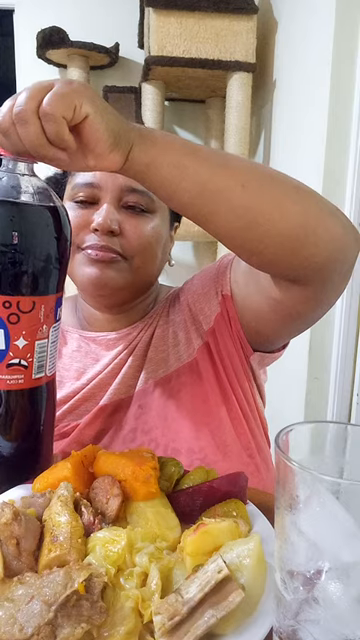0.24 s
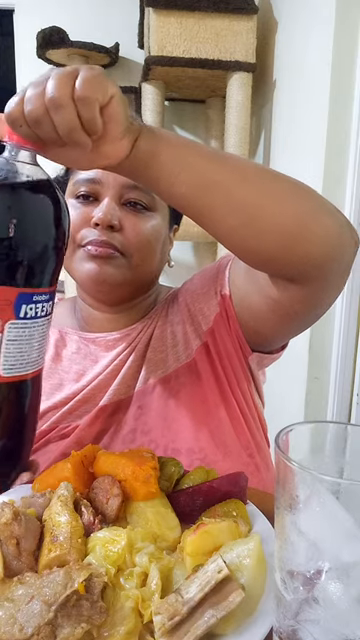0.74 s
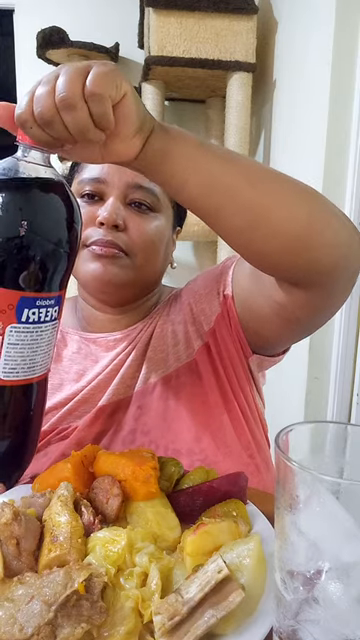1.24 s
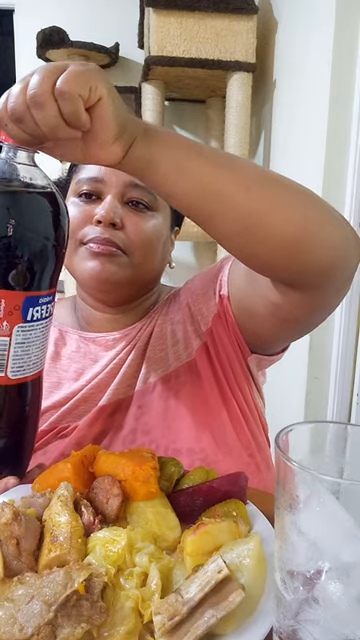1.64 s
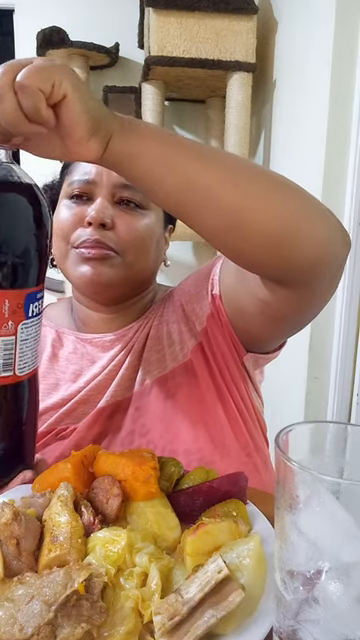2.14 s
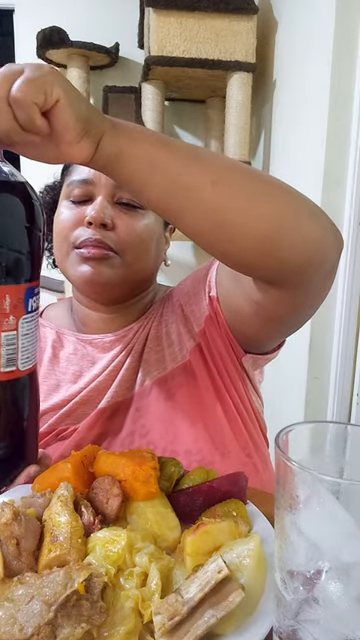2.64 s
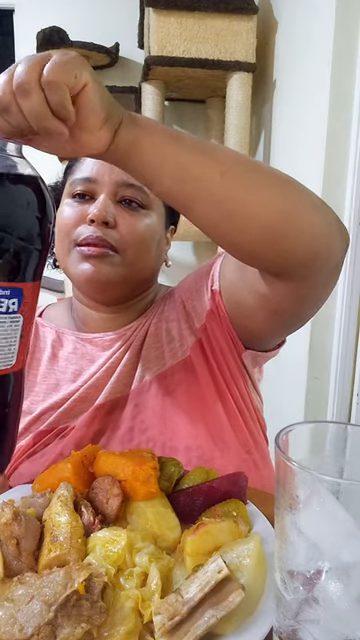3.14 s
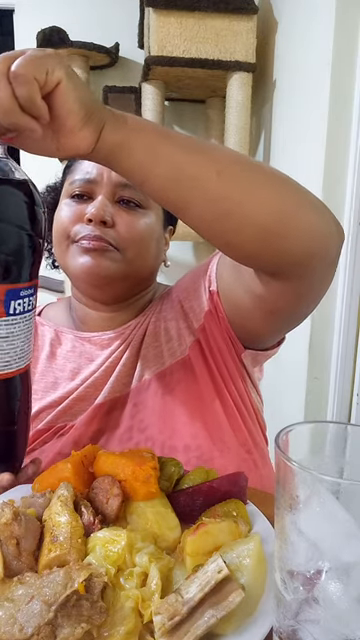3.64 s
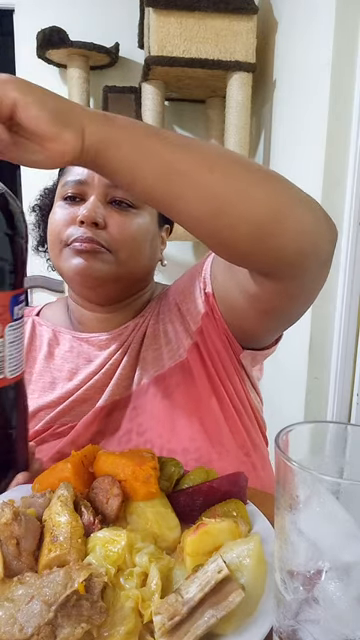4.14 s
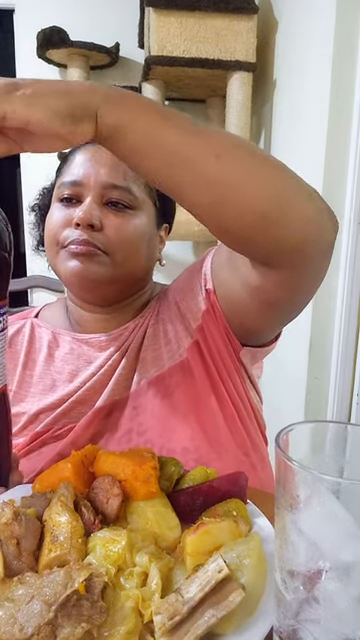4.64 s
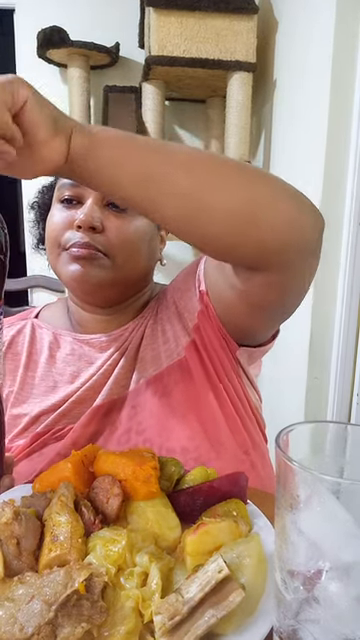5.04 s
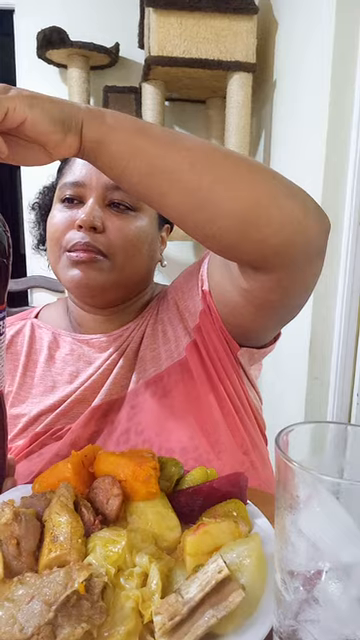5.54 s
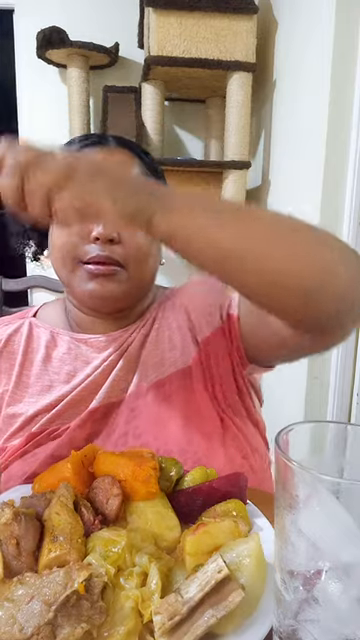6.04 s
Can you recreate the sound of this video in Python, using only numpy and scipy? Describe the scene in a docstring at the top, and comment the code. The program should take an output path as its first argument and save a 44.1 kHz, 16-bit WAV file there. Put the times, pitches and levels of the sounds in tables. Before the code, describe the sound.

A plastic soda bottle is eased open close to the microphone in a small, quietly rumbling room. Gas hisses out in two long spurts and a third short one. The cap's ring then snaps and clicks in a quick cluster as fingers rub the plastic. Faint thin squeaks and light ticks follow as the cap turns, while a vehicle's low drone grows outside.

```python
"""A plastic bottle cap is eased open near a two-port microphone, in a small, hard, quietly rumbling room.
First, gas escapes through the thread in three spurts: turbulent jet noise shaped by the neck's resonances.
From about 3 s a vehicle drones up outside, its harmonics rising with the engine's firing rate.
Near 4 s the cap's ring snaps and clicks, each impulse exciting damped modes, and fingers rub the plastic.
Last, friction in the thread gives faint squeaks as the cap comes off."""
import sys
import numpy as np
from scipy import signal
from scipy.fft import rfft, irfft
from scipy.io import wavfile
from scipy.ndimage import uniform_filter1d

SR = 44100
rng = np.random.default_rng(int(sys.argv[2]) if len(sys.argv) > 2 else 0)


def output_pcm(signal):
    """Save a mono or channel-first signal as 16-bit PCM at the path in sys.argv[1].

    Samples are clipped to [-1, 1] before scaling.
    """
    pcm = np.clip(np.atleast_2d(signal).T, -1, 1) * 32767
    wavfile.write(sys.argv[1], SR, np.round(pcm).astype(np.int16))


N = 276810
T = np.arange(N) / SR

# Likeness of diffuse sound at the two ports: frequency_hz, correlation
COHERENCE = [(60, 0.93), (150, 0.98), (380, 0.49), (950, 0.041), (2380, -0.023), (5980, 0.00097),
             (15000, -0.089)]
# Spectrum of the room's rumble and hiss: frequency_hz, density_db
AIR_SPECTRUM = [(15, -81), (25, -60.5), (80, -1), (129, -3.5), (165, -2), (241, -10.5), (424, -12.5),
                (460, -17.5), (498, -16.5), (670, -23), (2190, -31), (2950, -28), (3470, -30),
                (8220, -34.5), (15700, -29.5)]
# Broad resonances in that hiss: centre_hz, width_hz, gain_db
AIR_RESONANCES = [(2700, 420, 5), (8100, 340, 11)]
# Irregular swells of a low rumble near 75 Hz: time_s, level_db
LOW_SWELLS = [(0.0, -49.5), (1.08, -63), (1.31, -48), (1.4, -56.5), (1.89, -46), (1.99, -54), (3.58, -61),
              (3.61, -47), (4.47, -54), (4.91, -41), (5.03, -51), (5.5, -43), (5.59, -60), (5.73, -46.5),
              (6.2, -45), (6.27, -62)]
# The engine speeding up: time_s, firing_rate_hz
FIRING_RATE = [(2.8, 54.03), (3.84, 54.62), (4.2, 56.68), (4.62, 57.56), (4.8, 58.78), (5.25, 58.76),
               (5.49, 60.13), (5.8, 60.66), (6.28, 61.05)]
# Engine harmonics that swell and sink: time_s, second_db, third_db, fifth_db
THROBBING_ORDERS = [(2.8, -76, -71, -75), (3.6, -59, -55, -75), (3.84, -53, -57, -63.5),
                    (4.21, -51, -51, -66), (4.33, -69, -50.5, -70), (4.62, -44, -49.5, -58.5),
                    (4.8, -37, -68, -59), (5.02, -45.5, -63, -51.5), (5.22, -43.5, -54, -46.5),
                    (5.33, -48, -52, -61), (5.42, -34, -55, -49), (5.56, -33.5, -54, -55),
                    (5.75, -47.5, -51, -52), (5.8, -39.5, -45, -51), (6.11, -38.5, -48.5, -50),
                    (6.28, -38, -44, -52.5)]
# Level of a low rumble, under the gas spurts at first, then the approaching vehicle: time_s, level_db
RUMBLE_LEVEL = [(0.0, -49), (0.56, -54.5), (1.17, -55.5), (1.62, -49.5), (2.48, -54), (2.64, -66),
                (3.55, -57), (3.98, -51), (4.65, -46), (5.63, -44.5), (6.28, -41.5)]
# Spectrum of that rumble: frequency_hz, density_db
RUMBLE_SPECTRUM = [(18, -56), (30, -34), (123, -3.5), (208, -16), (301, -10.5), (401, -15.5), (660, -20.5),
                   (952, -25.5), (2040, -31), (2640, -26.5), (3260, -32), (5800, -41.5), (15700, -49)]
# Engine harmonics that follow its level: harmonic_number, level_re_rumble_db
RUMBLE_ORDERS = [(1, -38), (4, -10.5), (6, -17), (7, -17.5), (8, -18), (9, -17), (10, -33), (11, -24)]
# Reverberation time of the room: frequency_hz, t60_s
REVERB_TIME = [(500, 0.22), (1500, 0.3), (3500, 0.29), (9000, 0.26), (15000, 0.2)]
# Colour of the reverberation, as walls and cloth absorb treble: frequency_hz, gain_db
REVERB_SPECTRUM = [(500, 0), (3000, -1), (6000, -4), (10000, -3), (15000, -5.5)]
# Finger strokes on the plastic: start_s, length_s, level_db
RUB_STROKES = [(3.975, .04, -44.5), (4.597, 0.11, -38), (4.715, 0.033, -39.5), (4.77, .02, -40),
               (4.806, 0.041, -42), (5.22, 0.14, -47.5), (5.706, 0.08, -52), (5.862, 0.11, -49.5),
               (5.942, 0.12, -43), (6.087, 0.017, -47)]
# Spectrum of the rubbing: frequency_hz, density_db
RUB_SPECTRUM = [(300, -45), (700, -11), (1400, -6), (2000, -2.5), (2800, -3.5), (4300, -6), (6000, -18),
                (12000, -18.5)]
# Squeaks of the thread: start_s, length_s, first_pitch_hz, last_pitch_hz, level_db
SQUEAK_GLIDES = [(5.375, .035, 8600, 9400, -57), (5.41, .085, 10300, 9300, -66),
                 (5.5, .04, 9150, 9000, -62), (5.54, .04, 9150, 9650, -69), (5.58, .03, 9650, 8600, -69),
                 (5.625, .035, 11000, 9500, -68), (5.745, .062, 7950, 9000, -49),
                 (5.8, .028, 8800, 7900, -54), (5.87, .085, 13600, 14750, -62)]
# Snaps and ticks: start_s, level_db (over 4 ms), place (0 body, 1 wall, 2 cap, 3 rim), left_right_db
SNAPS = [(2.1894, -23, 1.86, -3), (2.7552, -44, 3.04, -2), (3.77, -39, 3.6, -2), (3.8057, -46, 2.5, -1),
         (3.899, -25.5, 2.8, 1), (4.0193, -17, 1.87, 0.5), (4.0435, -23.5, 2.4, 1), (4.0657, -24.5, 2.8, 0),
         (4.0824, -39, 4.2, -9), (4.1165, -39, 3.7, 3), (4.1482, -30.5, 2.6, -2), (4.227, -44.5, 2.6, -2),
         (4.3026, -43.5, 3.6, -3), (4.4245, -25, 1.9, -1.5), (4.4768, -25, 2.66, -1),
         (4.4986, -22.5, 2.5, 2), (4.5071, -25.5, 2.35, -4), (4.5283, -12, 1.77, -1.5),
         (4.5805, -20, 2.1, -3), (4.6717, -39.5, 2.2, -4), (4.6944, -42, 1.9, 1.5), (4.815, -27.5, 0.68, 2),
         (5.0286, -40.5, 3.3, 0), (5.0455, -40.5, 3.1, -1), (5.1793, -44, 1.05, 3), (5.2097, -37, 1, 2),
         (5.2345, -55, 2.84, 3), (5.267, -52, 3.2, -1), (5.2811, -40, 1, 0), (5.4473, -48, 3.2, -1),
         (5.4984, -46.5, 2.9, -2), (5.6144, -54, 3, 3), (5.7487, -53, 4, -1), (5.799, -46, 3.3, 1),
         (5.8303, -48, 3.2, 1), (5.9506, -34, 3.4, -2), (5.9704, -43, 4.2, 1), (6.095, -41.5, 2.2, 0),
         (6.1649, -49, 3.6, -8)]
# Modes of the bottle's body and wall, the cap and its rim: frequency_hz, level_db, t60_s
BODY_MODES = [(446, 3.5, 0.0098), (770, -12, 0.011), (960, 6, 0.0073), (1374, 4, 0.02)]
WALL_MODES = [(1750, -3, .004), (2050, 0, .007), (2450, -1, .004), (2850, 0, .004)]
CAP_MODES = [(3540, 8, 0.0027), (4410, 15, 0.0027), (5050, -24, 0.012), (6060, -12, 0.011)]
RIM_MODES = [(8440, 14.5, 0.0014), (9960, -16.5, 0.00067), (11900, 4.5, 0.0016), (14100, 0, 0.0026),
             (14200, -18, .002)]
# Course of the gas flow, one table a spurt: time_s, flow_db, neck_resonance_db, treble_lift_db
SPURT_FLOWS = [
    [(0.0, -30, -5.5, 3.5), (0.068, -21, -4, 2), (0.15, -17, -3, 0.5), (0.25, -18.5, -4.5, 0),
     (0.366, -20.5, -5, 1), (0.42, -27, -4, 5), (0.92, -32, -6, 3.5), (1.098, -34.5, -5, 3),
     (1.24, -51, -19, 4)],
    [(1.24, -53, -11, -4.5), (1.38, -34.5, -7, 6.5), (1.56, -28, -11.5, 1), (1.62, -21.5, -12.5, -1.5),
     (1.72, -23, -13.5, -0.5), (1.964, -32.5, -11.5, -6.5), (2.1, -23, -12, -2), (2.178, -26, -14.5, -4),
     (2.212, -22.5, -6.5, 1), (2.348, -20.5, -2, 4.5), (2.496, -28, -6.5, 1.5), (2.616, -43.5, -5, 0),
     (2.72, -93, -9, -1)],
    [(3.12, -66, -3, -1), (3.17, -49, -5.5, -5), (3.294, -17.5, -13, 1), (3.34, -22, -14, -1),
     (3.396, -45.5, -14, -8), (3.55, -64, -19, -6)],
]
# Spectrum of the jet: frequency_hz, density_db
JET_SPECTRUM = [(290, -66), (500, -31), (1070, -28), (1470, -13.5), (1660, -12), (2030, 5.5), (2240, 0),
                (2700, 5), (2900, -12), (4350, -5), (6700, -7), (8950, -0.5), (10500, -7), (11400, -7.5),
                (15700, -6)]
# Gains of the jet's upper bands, one row a spurt: neck_overtone_db, gap_whistle_db, spray_db
JET_BANDS = [(-1, 0.6, 3.5), (-1.5, 0.45, 3.), (-1, 1.5, 2)]
# Neck and thread resonances, shifting as the cap turns, one table a spurt: centre_hz, width_hz, gain_db
THREAD_RESONANCES = [
    [(2050, 180, -2.5), (2316, 95, 6), (2490, 50, -14), (2610, 33, 4), (3890, 100, 2), (4600, 200, -2.5),
     (5500, 110, -8), (7600, 240, 0), (9170, 310, -1), (12600, 200, -11), (13200, 200, 1)],
    [(1990, 100, -5.5), (2720, 580, 0.5), (2672, 60, -21), (4400, 235, 4.5), (6900, 350, -2.5),
     (7840, 200, -6), (8160, 360, -0.5), (8800, 240, -2), (9460, 220, -0.5), (11960, 130, -4)],
    [(1960, 44, -15), (6100, 230, -3), (7450, 170, -6), (8130, 250, 4.5), (8720, 105, -8), (9300, 110, -9),
     (12100, 88, -12)],
]
# Level difference of the ports, which face different ways: frequency_hz, left_right_db
PORT_BALANCE = [(60, 1), (120, 2.5), (240, -3.5), (480, 3), (950, 0), (1890, 1), (3770, 2), (7520, 3),
                (15000, -3)]


def gain_of(db):
    """Decibels to amplitude."""
    return 10 ** (np.asarray(db) / 20)


def unit_rms(x):
    """Normalises to rms 1."""
    return x / np.sqrt(np.mean(x ** 2) + 1e-20)


def spectrum_at(points, hz):
    """Interpolates a table on a log-frequency axis."""
    f, value = np.transpose(points)
    return np.interp(np.log(hz + 1), np.log(f + 1), value)


def add(mix, start_s, sound):
    """Superposes a sound on the mix."""
    part = mix[:, round(start_s * SR):][:, :sound.shape[-1]]
    part += sound[..., :part.shape[-1]]


def wander(top_hz, t):
    """Random modulation: sinusoids of random phase spanning one decade; rms 1."""
    rates_hz = np.geomspace(.1 * top_hz, top_hz, 16)
    return unit_rms(sum(np.sin(2 * np.pi * (f * t + rng.random())) / np.sqrt(f) for f in rates_hz))


def patches(noise, bins, frames):
    """Moving averages correlate noise over frequency and time; rms 1."""
    return unit_rms(uniform_filter1d(uniform_filter1d(noise, bins, axis=0), frames, axis=1))


def lowpass(x, hz):
    """Steep zero-phase low-pass."""
    return signal.oaconvolve(x, signal.firwin(1023, hz, window=("kaiser", 9), fs=SR)[None], "same")


def diffuse_noise(spectrum, patchy_db, size):
    """A diffuse field: coherent between the ports in the bass, with drifting spectral patches; rms 1."""
    frames, hz = 4 * N // size + 5, np.fft.rfftfreq(size, 1 / SR)
    a, b, c, d, drift = rng.standard_normal((frames, len(hz), 5)).T
    coherence = np.clip(spectrum_at(COHERENCE, hz), -1, 1)[:, None]
    left = a + 1j * b
    right = coherence * left + np.sqrt(1 - coherence ** 2) * (c + 1j * d)
    shape = gain_of(spectrum_at(spectrum, hz)[:, None] + patchy_db * patches(drift, bins=12, frames=12))
    noise = signal.istft(np.array([left, right]) * shape, nperseg=size, noverlap=3 * size // 4)[1]
    return unit_rms(noise[:, :N])


def room_air(level_db=-52):
    """Ambient noise: steady rumble and hiss with two broad Lorentzian resonances."""
    hz = np.geomspace(15, 16000, 400)
    peaks_db = sum(db / (1 + (2 * (hz - f) / width) ** 2) for f, width, db in AIR_RESONANCES)
    spectrum = np.transpose([hz, spectrum_at(AIR_SPECTRUM, hz) + peaks_db])
    return gain_of(level_db) * diffuse_noise(spectrum, patchy_db=-0.64, size=2048)


def low_swells(centre_hz=75, stage_width_hz=14):
    """Narrow-band noise: a random envelope on a low carrier, heard as a rumble that swells irregularly."""
    pole = np.exp(-np.pi * stage_width_hz / SR)
    envelope = rng.standard_normal(N) + 1j * rng.standard_normal(N)
    for _ in range(3):
        envelope = signal.lfilter([1], [1, -pole], envelope)
    rumble = unit_rms((envelope * np.exp(2j * np.pi * centre_hz * T)).real)
    return rumble * gain_of(np.interp(T, *np.transpose(LOW_SWELLS)))


def rumble_and_vehicle():
    """A broadband rumble, first under the spurts; later an engine's periodic firing adds harmonics."""
    cycles = np.cumsum(np.interp(T, *np.transpose(FIRING_RATE))) / SR
    rumble_db = np.interp(T, *np.transpose(RUMBLE_LEVEL))
    times, *throb_db = np.transpose(THROBBING_ORDERS)
    orders = [(k, np.interp(T, times, db, left=-90), .6) for k, db in zip((2, 3, 5), throb_db)]
    orders += [(k, np.where(T > times[0], rumble_db, -90) + db, 4.) for k, db in RUMBLE_ORDERS]
    drone, coarse_t = 0, T[::256]
    for k, db, waver_db in orders:
        level = gain_of(db + np.interp(T, coarse_t, waver_db * wander(7, coarse_t)))
        drone += level * np.sin(2 * np.pi * (k * cycles + rng.random()))
    rumble = gain_of(rumble_db) * diffuse_noise(RUMBLE_SPECTRUM, patchy_db=3., size=2048)
    return np.sqrt(2) * drone + rumble


def reverb_tail():
    """Reverberation: sparse reflections of random sign, each band decaying exponentially at its own rate."""
    taps = np.zeros((2, SR // 2))
    arrivals = np.arange(280, SR // 2 - 20, 20) + rng.integers(0, 20, (2, (SR // 2 - 281) // 20))
    np.put_along_axis(taps, arrivals, rng.choice([-1., 1.], arrivals.shape), 1)
    hz, t, bands = signal.stft(taps, SR, nperseg=256)
    decay_db = 60 * t / spectrum_at(REVERB_TIME, hz)[:, None]
    bands *= gain_of(spectrum_at(REVERB_SPECTRUM, hz)[:, None] - decay_db)
    taps = signal.istft(bands, SR, nperseg=256)[1]
    return taps / np.linalg.norm(taps[0])


def room(x, early_db, tail_db, echoes):
    """Multipath propagation: direct sound, early echoes off hand, table and bottle, then the walls' tail."""
    taps = gain_of(tail_db) * reverb_tail()
    arrivals = rng.integers(12, 270, (2, echoes))
    np.put_along_axis(taps, arrivals, gain_of(early_db) * rng.choice([-1., 1.], (2, echoes)), 1)
    taps[0, 0] = taps[1, 8] = 1  # the left port is nearer
    return signal.fftconvolve(x, taps / np.linalg.norm(taps, axis=1)[:, None], axes=1)[:, :N]


def shifting_echoes(x, rate_hz):
    """Changing interference: as hand and bottle shift, one echo pattern crossfades into the next."""
    heard = np.zeros((2, N))
    for k in np.arange(np.ceil(rate_hz * len(x) / SR) + 1):
        window = np.cos(np.pi / 2 * np.clip(rate_hz * T[:len(x)] - k, -1, 1))
        start = max(0, round((k - 1) / rate_hz * SR))
        piece = (x * window)[None, start:round((k + 1) / rate_hz * SR)]
        add(heard, start / SR, room(piece, early_db=-7., tail_db=1., echoes=30))
    return heard


def finger_rub(stroke_fade_db=-10.5, release_db_per_s=-300):
    """Sliding friction of fingers on cap and bottle makes a grainy mid-range noise."""
    level = 0
    for start, length, db in RUB_STROKES:
        fade_db = stroke_fade_db * np.clip((T - start) / length, 0, 1)
        release_db = release_db_per_s * np.maximum(T - start - length, 0)
        level += (T > start) * gain_of(db + fade_db + release_db)
    grainy_level = uniform_filter1d(level, size=400) * gain_of(2. * wander(90, T))
    return grainy_level * diffuse_noise(RUB_SPECTRUM, patchy_db=2.5, size=512)


def thread_squeak(length_s, from_hz, to_hz, level_db, edge_db=-8):
    """Friction in the dry thread sustains a thin, unsteady tone that glides, swells and dies."""
    t = np.arange(0, length_s, 1 / SR)
    pitch_hz = (from_hz + (to_hz - from_hz) * t / length_s) * (1 + 0.009 * wander(330, t))
    arch_db = edge_db * (2 * t / length_s - 1) ** 2
    level = gain_of(level_db + arch_db + 2.1 * wander(150, t)) * signal.windows.tukey(len(t), .2)
    return np.sqrt(2) * level * np.sin(2 * np.pi * np.cumsum(pitch_hz) / SR)


def faint_ticks(count=12, from_s=3.45, level_db=-55, spread_db=2.5):
    """Small random impacts from handling the loose cap, as rows like those of SNAPS."""
    when, size, place, pan = rng.random((count, 4)).T
    start_s = from_s + (np.arange(count) + when) / count * (N / SR - from_s)
    return list(zip(start_s, level_db + 2 * spread_db * (size - .5), 2.8 + place - .5, 6 * (pan - .5)))


def cap_snap(level_db, place, pan_db, chance, falloff_db=4):
    """An impulse excites damped modes; returns the snap bare, and scattered by hand, neck and table."""
    t = np.arange(600) / SR
    reflections, detunings = chance[:540].reshape(2, 270), 1 + chance[540:] / 40
    snap = 0
    for part, modes in enumerate((BODY_MODES, WALL_MODES, CAP_MODES, RIM_MODES)):
        ring = sum(gain_of(db - 60 * t / t60) * np.cos(2 * np.pi * hz * detune * t)
                   for (hz, db, t60), detune in zip(modes, detunings))
        edges_hz = [1.034 * modes[0][0], min(1.13 * modes[-1][0], 20000)]
        ring = signal.sosfilt(signal.butter(2, edges_hz, "band", fs=SR, output="sos"), ring)
        coupling = gain_of(-falloff_db * (part - place) ** 2)  # weaker away from the struck place
        snap += coupling * ring / np.linalg.norm(ring)
    scatter = 0.2 * reflections ** 3 * gain_of(-2200 * t[:270]) * signal.windows.tukey(270, .15)
    scatter[0, 0] = scatter[1, 8] = 1  # direct sound
    scatter /= np.linalg.norm(scatter, axis=1)[:, None]
    port_db = level_db + np.array([[pan_db / 2], [-pan_db / 2]])
    level = gain_of(port_db) * np.sqrt(0.004 * SR) / np.linalg.norm(snap)
    return level.mean() * snap, level * signal.fftconvolve(scatter, snap[None], axes=1)


def gas_spurt(flow, resonances, overtone_db, whistle_db, spray_db):
    """Source and filter: turbulent jet noise, its bands following the opening, excites neck and thread."""
    times, flow_db, neck_db, lift_db = np.transpose(flow)
    length = round((times[-1] - times[0]) * SR)
    frames, hz = length // 256 + 5, np.fft.rfftfreq(1024, 1 / SR)
    frame_t = times[0] + np.arange(frames) * 256 / SR
    bands = [((hz > 1500) & (hz < 3000), neck_db),
             ((hz > 3700) & (hz < 5300), overtone_db + 0.36 * lift_db),
             ((hz > 6800) & (hz < 10600), whistle_db + 0.69 * lift_db),
             (hz > 10800, spray_db + lift_db)]
    opening_db = sum(uniform_filter1d(1. * band, size=15)[:, None] * np.interp(frame_t, times, db)
                     for band, db in bands)
    colour_db = spectrum_at(JET_SPECTRUM, hz)[:, None] + opening_db
    power = .5 + sum(gain_of(2 * db) / (1 + (2 * (hz - f) / width) ** 2) for f, width, db in resonances)
    real, imag, drift = rng.standard_normal((frames, 513, 3)).T
    shape = gain_of(colour_db + 1.05 * patches(drift, bins=14, frames=16)) * np.sqrt(power)[:, None]
    shape /= np.sqrt((shape ** 2).mean(0))  # equal power in every frame
    jet = unit_rms(signal.istft((real + 1j * imag) * shape, nperseg=1024, noverlap=768)[1][:length])
    t = times[0] + np.arange(length) / SR
    sputter_db = 0.22 * wander(120, t)  # foam at the gap makes the flow flutter
    level = gain_of(np.interp(t, times, flow_db) + sputter_db)
    return jet * level * signal.windows.tukey(length, 200 / length)


def scene():
    """Superposition of gas, cap, room and street at the two ports."""
    gas, bare_snaps, thread = np.zeros((3, 1, N))
    close_snaps = np.zeros((2, N))
    for flow, resonances, bands in zip(SPURT_FLOWS, THREAD_RESONANCES, JET_BANDS):
        add(gas, flow[0][0], gas_spurt(flow, resonances, *bands))
    hiss = gain_of(3.) * shifting_echoes(gas[0, :round(3.6 * SR)], rate_hz=4.952)
    impacts = SNAPS + faint_ticks()
    for (start_s, *impact), chance in zip(impacts, rng.standard_normal((len(impacts), 545))):
        bare, scattered = cap_snap(*impact, chance)
        add(bare_snaps, start_s, bare)
        add(close_snaps, start_s, scattered)
    for start_s, *glide in SQUEAK_GLIDES:
        add(thread, start_s, thread_squeak(*glide))
    snap_reverb = gain_of(-6.5) * signal.fftconvolve(bare_snaps, reverb_tail(), axes=1)[:, :N]
    squeaks = gain_of(1.5) * room(thread, early_db=-14., tail_db=-13., echoes=6)
    bottle = hiss + snap_reverb + squeaks + finger_rub()
    background = rumble_and_vehicle() + low_swells() + room_air()
    return lowpass(bottle + background, hz=15760) + close_snaps


def record(dry):
    """Directivity gives each port its own frequency response; a low-pass limits the bandwidth."""
    half_db = spectrum_at(PORT_BALANCE, np.fft.rfftfreq(N, 1 / SR)) / 2
    coloured = irfft(rfft(dry) * gain_of([half_db, -half_db]), N)
    return lowpass(coloured, hz=16980)


dry = scene()
out = record(dry)
output_pcm(out)
```